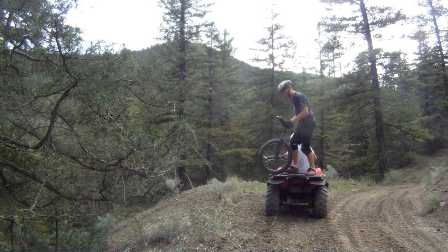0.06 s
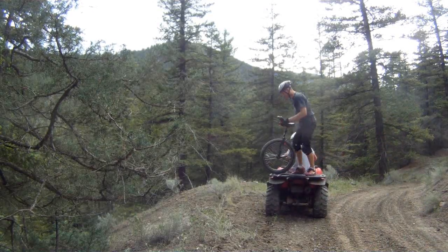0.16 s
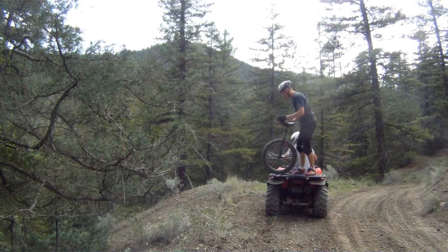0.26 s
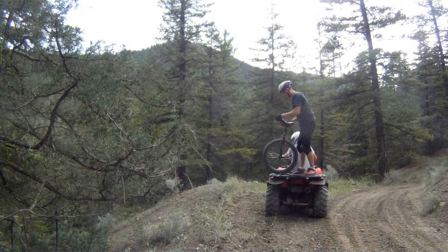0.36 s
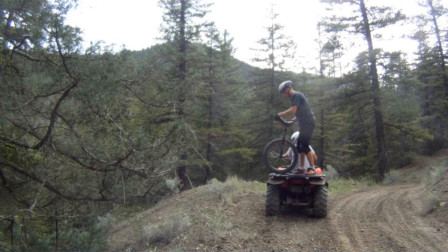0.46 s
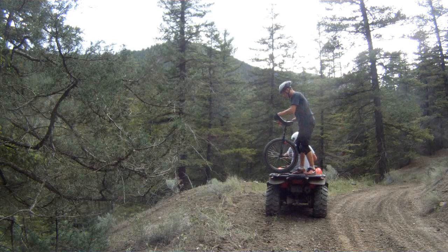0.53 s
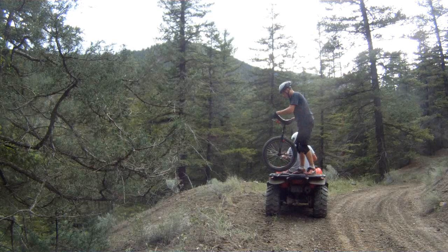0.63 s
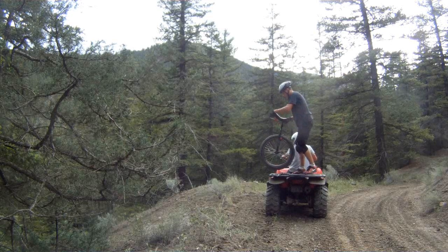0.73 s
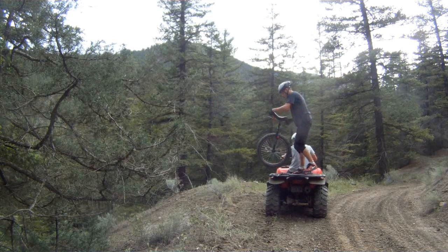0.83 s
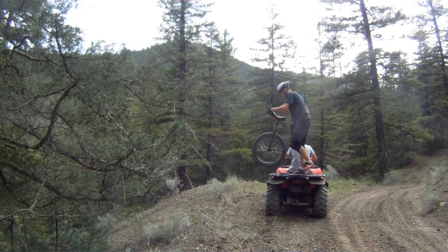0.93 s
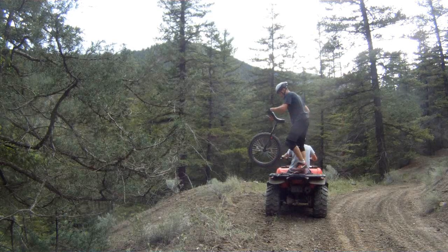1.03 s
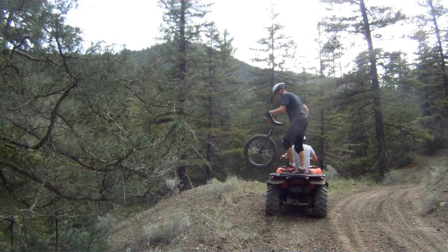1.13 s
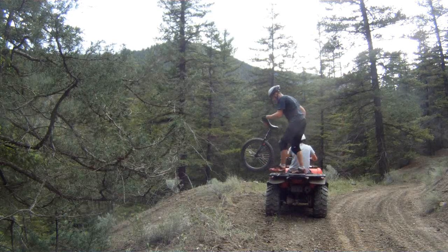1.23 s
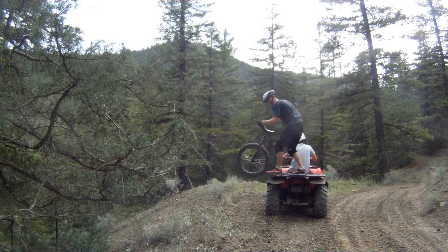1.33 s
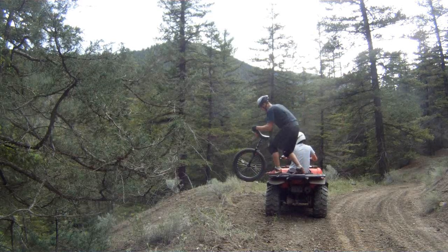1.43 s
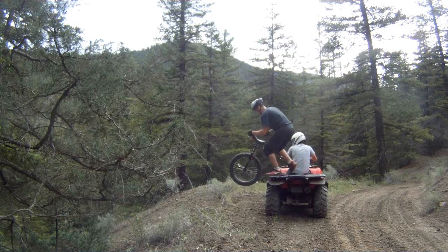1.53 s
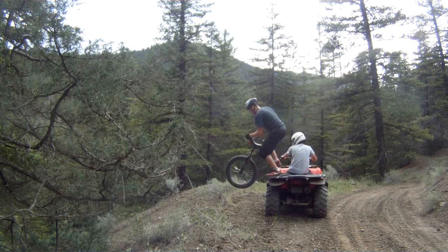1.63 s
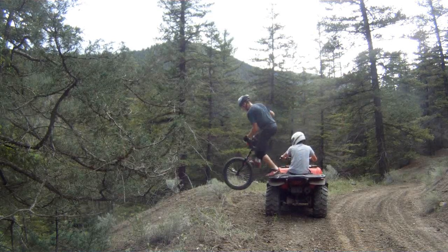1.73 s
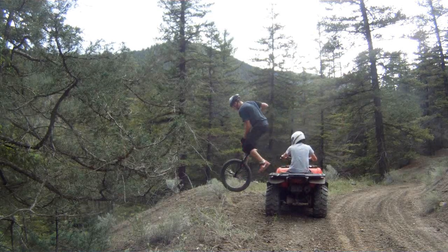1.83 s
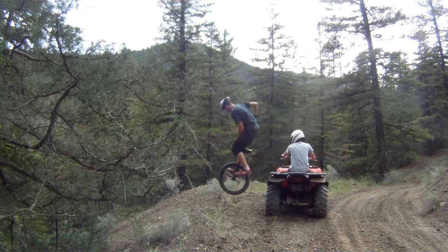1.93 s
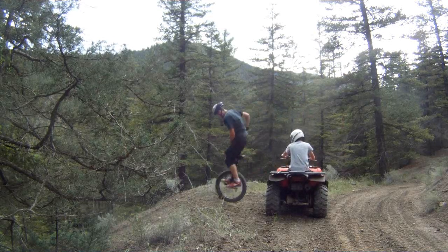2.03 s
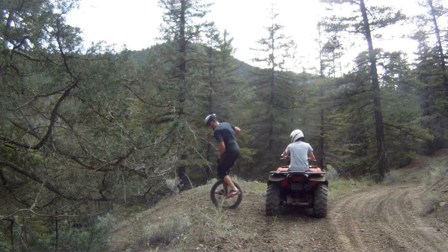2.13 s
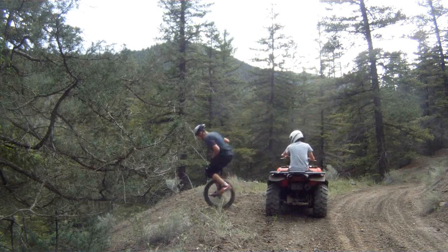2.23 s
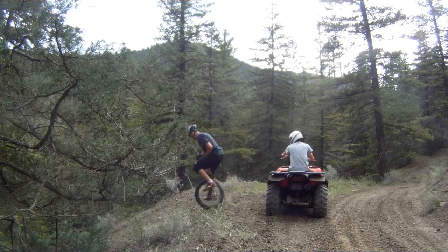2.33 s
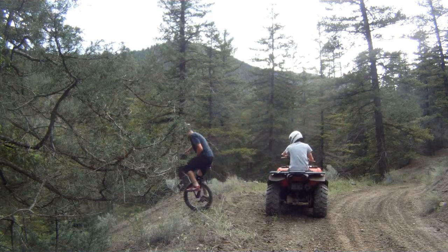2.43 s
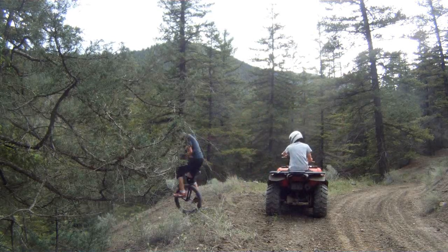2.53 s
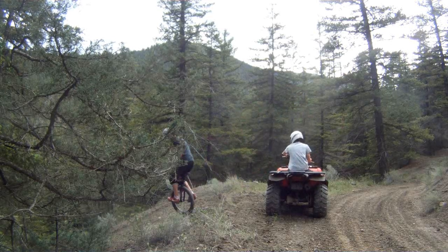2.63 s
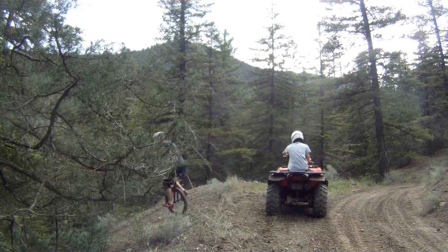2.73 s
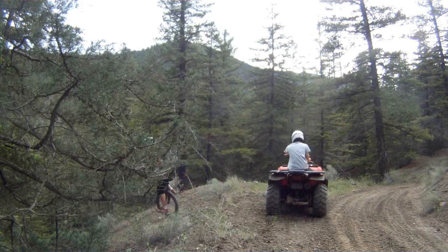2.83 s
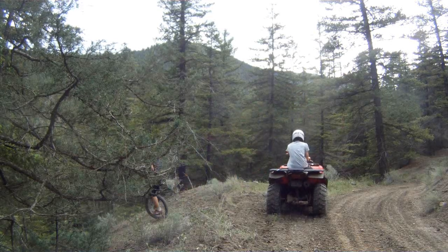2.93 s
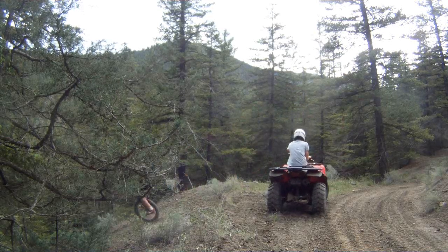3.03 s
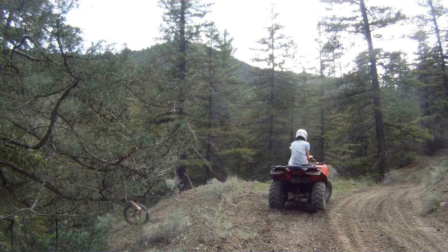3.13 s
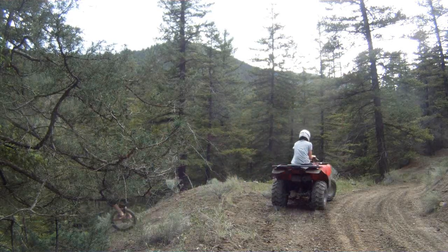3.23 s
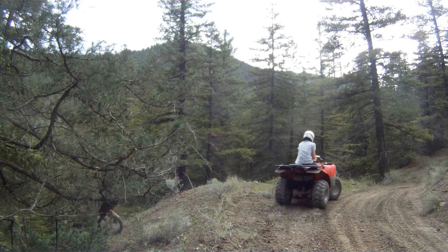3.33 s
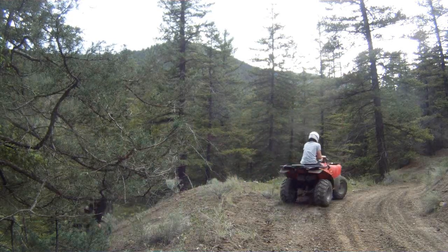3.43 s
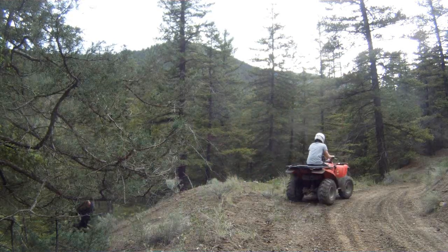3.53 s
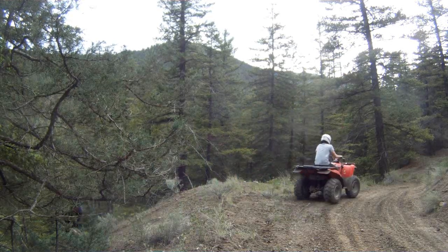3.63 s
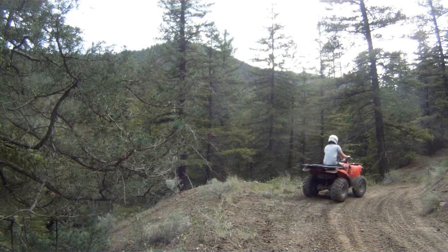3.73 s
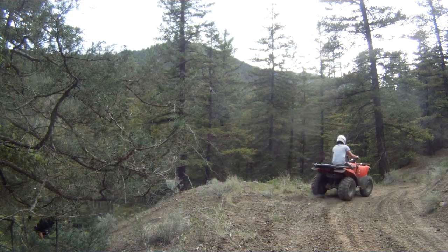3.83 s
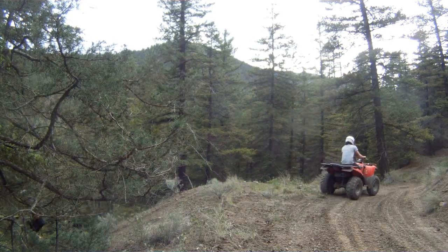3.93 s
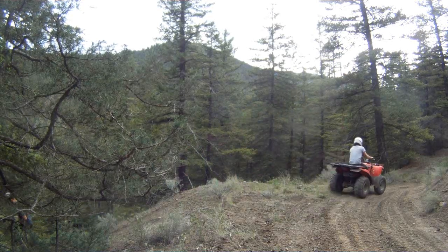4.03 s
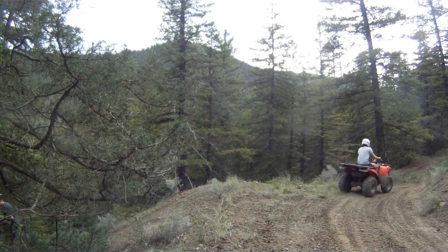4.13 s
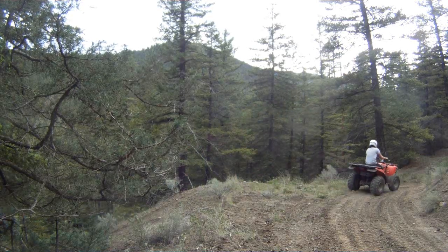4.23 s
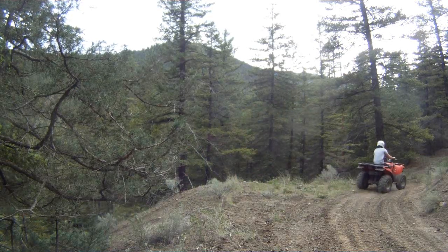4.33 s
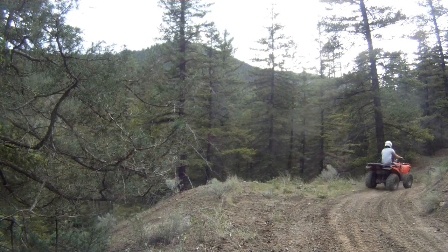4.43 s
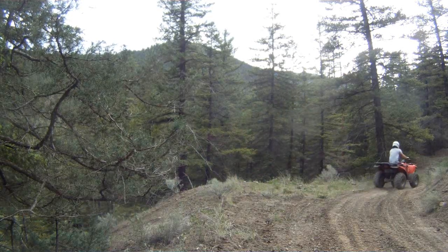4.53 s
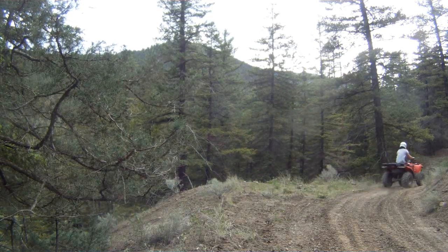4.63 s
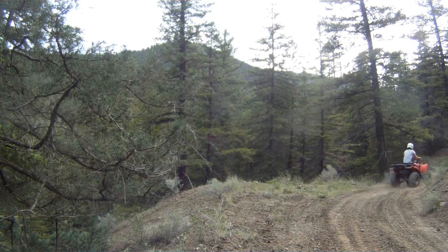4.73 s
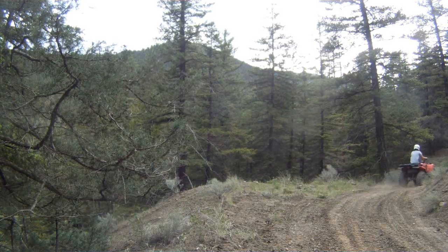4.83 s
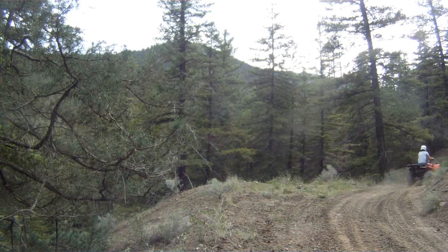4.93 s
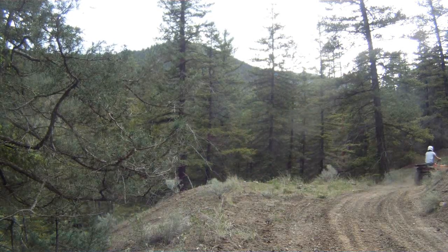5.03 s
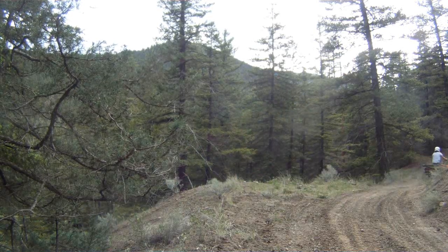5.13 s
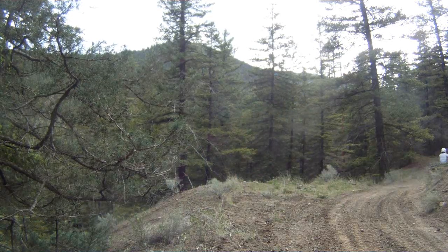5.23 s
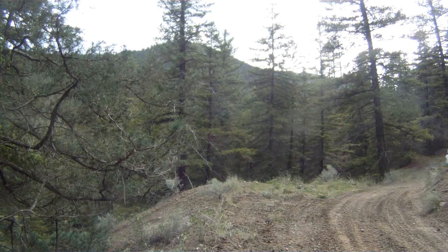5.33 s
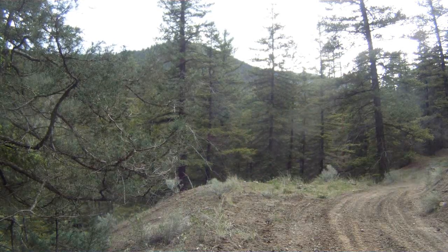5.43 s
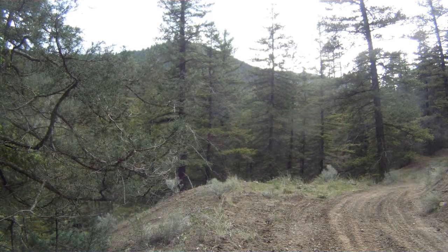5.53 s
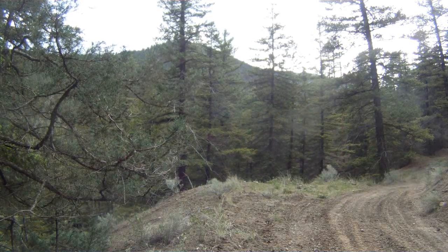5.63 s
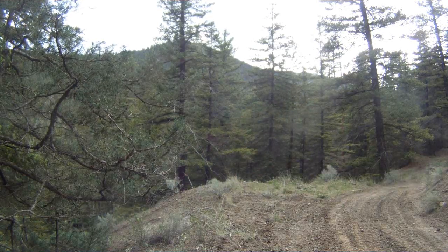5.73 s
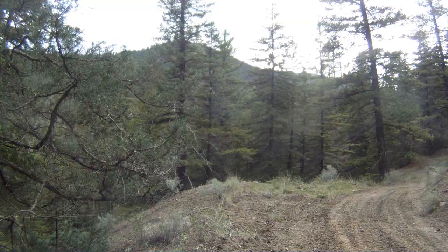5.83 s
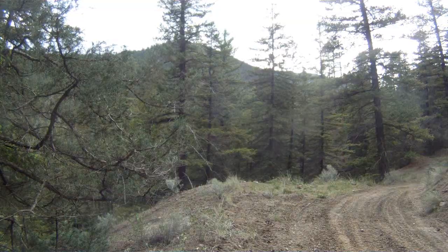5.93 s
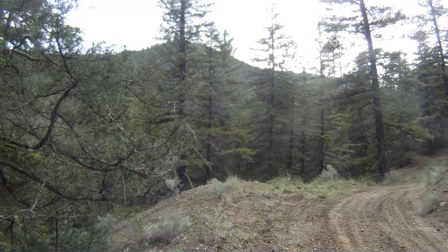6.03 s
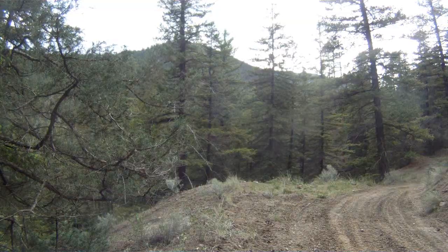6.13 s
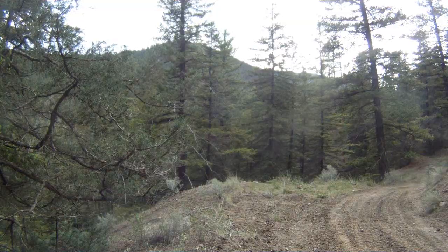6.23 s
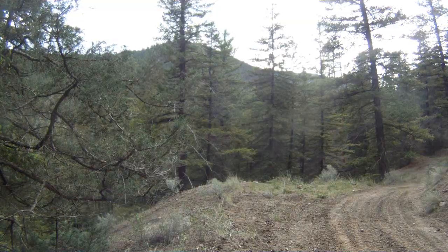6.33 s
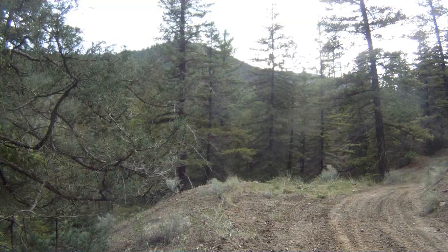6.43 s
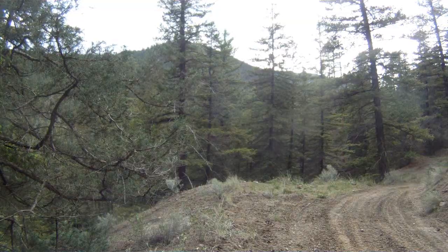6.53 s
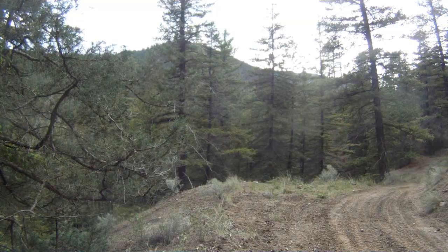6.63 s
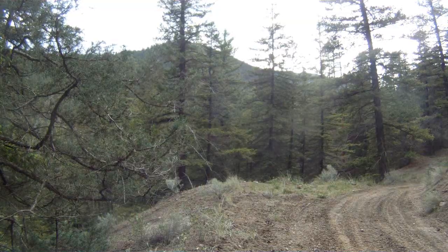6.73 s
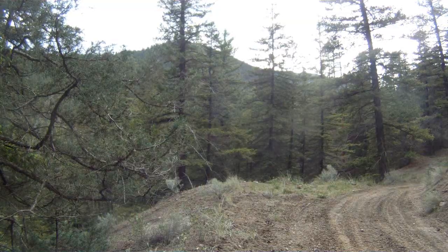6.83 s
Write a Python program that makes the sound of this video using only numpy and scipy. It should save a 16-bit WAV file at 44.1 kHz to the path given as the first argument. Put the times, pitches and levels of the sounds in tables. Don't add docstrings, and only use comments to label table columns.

```python
import sys
import numpy as np
from scipy import signal
from scipy.fft import rfft, irfft
from scipy.io import wavfile

SR = 44100
rng = np.random.default_rng(int(sys.argv[2]) if len(sys.argv) > 2 else 0)


def log_audio(samples):
    frames = np.atleast_2d(samples).T
    limited = np.clip(frames, -1, 1)
    pcm = np.round(limited * 32767).astype(np.int16)
    wavfile.write(sys.argv[1], SR, pcm)


def boost(x):
    u = np.asarray(x, float) / 20
    return 10 ** u


N = 302967
T = np.arange(N) / SR

# time_s, firings_per_s
SPEED = [(0.0, 9.03), (1.04, 9.03), (1.42, 8.34), (2.24, 8.19), (2.36, 13.53), (2.47, 17.29), (2.72, 30.08),
         (2.87, 35.88), (3.22, 35.68), (3.4, 37.68), (3.64, 44.08), (4.21, 56.05), (4.41, 57.81),
         (5.37, 51.75), (6.37, 49.02), (6.62, 49.45), (6.68, 44.97), (6.87, 45.37)]
# time_s, throttle_0_to_1, charge_db, loss_by_distance_and_terrain_db
DRIVE = [(0, 0, 1, -1), (1, 0.09, 1.5, 1), (2.07, 0.22, -2.5, -1), (2.19, 0, -4.5, -3), (2.25, .1, -5, -3),
         (2.3, 0.85, 2, 0.5), (2.64, 0.98, 3, 2.5), (3.45, 0.99, 0, 0), (3.9, 1, 2, 1),
         (4.35, 0.99, -2.5, -0.5), (4.75, 0.97, -2.5, 1.5), (5.1, 0.82, 0.5, 4), (5.45, 0.91, -0.5, 9.5),
         (5.9, 0.95, 1, 12.5), (6.64, 0.97, -1.5, 13.5), (6.69, 0.63, -1, 11), (6.87, 0.5, 5, 15)]
# centre_s, level_db
SURGES = [
    (2.55, 1.5),
    (2.86, -3.5),
    (3.15, 1),
    (3.53, -3.5),
    (3.9, 2.5),
    (4.15, -1.5),
    (4.4, 1),
    (5.27, 0.5),
]
# speed_firings_per_s, suction_dip_0_to_1, echo_0_to_1, round_trip_ms, muffler_ring_over_puff_db
PIPE_RESPONSE = [
    [(8.16, 0.23, 0, 14.4, -0.5), (9.17, 0.12, 0, 13.6, -1), (11.1, 0.53, 0.47, 12.1, -9),
     (19, 1, 0.42, 9.6, -5), (26.4, 1, 0.54, 8.45, -10), (33.7, 1, 0.26, 8.6, -29),
     (36.64, 0.86, 0.08, 10.8, -45), (36.6, 1, 0.5, 12.4, -21), (41.8, 0.9, 0.4, 9.7, -11),
     (44, 1, 0.6, 10.27, -26), (52.3, 0.37, 0.6, 8.96, -42), (57.2, 0.72, 0.56, 10.18, -14)],
    [(46, 0.7, .6, 9.6, -5), (46, 0.76, .8, 11, -30), (49.1, 0.7, 0.92, 10.9, -37),
     (50.86, 0.62, .94, 10.5, -35), (51.55, 0.55, 0.94, 9.7, -33), (53, .6, 0.62, 10.1, -38),
     (56.2, 0.73, 0.65, 10.4, -10.5), (58.4, 0.7, 0.47, 9.76, -15)],
]
# speed_firings_per_s, level_over_puff_db, lead_before_puff_cycles, pitch_hz
AIRBOX_HONK = [
    [(9, -23, 1, 210), (18.5, -37, 0.44, 290), (25.8, -13, 0.47, 290), (32.2, -11, .38, 293),
     (36.6, -8, 0.347, 306), (37.6, -12.5, 0.342, 288), (40.5, -13, 0.351, 278), (47.5, -19, 0.354, 258),
     (52.5, -6.5, 0.286, 276), (59.4, -10, 0.33, 298)],
    [(45.5, -21, 0.484, 240), (46, -13, 0.39, 280), (49.1, -10.5, 0.373, 293), (49.74, -6.5, 0.373, 297),
     (51, -13.5, 0.358, 299), (52.7, -8, 0.341, 306), (56.4, -8, 0.329, 269), (59, -11.5, 0.338, 260)],
]
# speed_firings_per_s, ring_over_puff_db, ring_pitch_hz, bark_near_1_khz_over_crack_db
TAILPIPE = [
    [(8.55, -27, 573, 15), (14.1, -10.5, 625, 11.5), (18.6, -40, 700, 11.5), (35.3, -40, 490, 10.5),
     (42.6, -55, 920, 5), (55.3, -13, 405, 6), (57.4, -5, 424, -4)],
    [(47, -18, 450, -22.5), (49.9, -20, 555, -19), (51.2, -14, 565, 7), (54.3, -27, 400, 2),
     (55.9, -6.5, 362, 3), (58.05, -5, 420, -4)],
]
# pitch_hz, level_db, t60_s
MUFFLER_MODES = [(92.5, -1, 0.11), (61.4, -6.5, 0.092), (129, -2, 0.04)]
# pitch_hz, level_db, t60_s
ECHO_MODES = [(116, -4.5, 0.15)]
# frequency_hz, density_db_per_hz
GAS_COLOUR = [(410, -25.5), (700, -2), (1040, -11), (1150, -2.5), (1370, -8.5), (1950, -6.5), (2840, -2.5),
              (3020, -3), (3390, -19), (3950, -11), (4470, -32.5), (5400, -27), (5900, -32), (7670, -70),
              (13000, -120)]
# frequency_hz, density_db_per_hz
RUSH_COLOUR = [(25, -38), (60, 2.5), (150, -1.5), (300, 2.5), (600, 1.5), (800, -6), (1100, -17.5),
               (1600, -34.5)]
# frequency_hz, density_db_per_hz
FOREST_COLOUR = [(300, -19), (1200, -12), (1800, -11), (2400, 5), (3000, -16), (3700, -2), (4800, -10.5),
                 (5900, -22)]
# pitch_hz, spread_percent, level_over_crack_db, t60_s, share_of_bark
OUTLET_RINGS = [(950, 9, -5, .022, 1), (2740, 6, 3, .024, -.9)]
# multiple_of_firing_rate, level_db
WHINE_ORDERS = [(11, -27.5), (12, -35.5), (13, -35)]
# frequency_hz, gain_db
COVER_RESONANCE = [(290, -45), (390, -6), (470, -7), (530, -3), (590, -3.5), (635, 0), (700, 1.5),
                   (750, -8)]
# start_s, peak_db, pitch_hz, t60_s
RACK_TICKS = [(0.2157, -20.5, 730, 0.024), (0.218, -30, 1700, 0.011), (.2175, -39, 2800, .015),
              (.289, -46, 2580, .03), (.3135, -24.5, 730, 0.03), (.315, -42, 1700, 0.017),
              (1.321, -50, 3930, .02), (1.333, -53, 4700, .02), (1.951, -56, 3740, 0.053),
              (2.113, -39, 2600, .025), (2.128, -42, 2450, 0.027), (2.142, -46, 2550, .03)]
# pitch_hz, level_db, t60_s
KNOCK_MODES = [(330, 11, 0.012), (414, -16.5, 0.11), (510, -28, 0.023), (1400, -18, 0.011),
               (2370, -14.5, 0.0099), (2900, -18, .014)]

START_CYCLE = -.0714
KNOCK_S, KNOCK_DB = 2.2663, -5
KNOCK_SWELL_S, KNOCK_EDGE_S, CRACK_EDGE_S = .0017, .0007, .0005
HONK_HALF_MS, SURGE_HALF_S = 5.54, 0.073
PUFF_DB, RISE_MS, CRACK_DB, WHINE_DB = (-18.5, -6), (2.43, 1.045), (-52, -23.5), (-17, 0)
ROAR_DB, RUSH_DB, FOREST_DB = (-62.5, -54), (-46.5, -43), (-67, -65)
IDLE_PER_S, ROAR_DB_PER_OCTAVE, RUSH_DB_PER_OCTAVE, FOREST_DB_PER_OCTAVE = 9.8, 7, 3.5, 7.5
ROAR_FADE, RUSH_FADE, FOREST_FADE, WHINE_FADE = 1.08, 0.9, 0.69, 0.97
CRACK_FADE_DB, CRACK_FADE_POWER = 14.5, 3.55
CRACK_HOLLOW_DB, CRACK_TOP_DB = -1.5, -1.5
IDLE_LIFT, IDLE_WHISTLE_DB, LIFT_PER_OCTAVE = (1.19, 1.26), (1.5, 11), (0, 0.4)
LIFT_FROM_PER_S = 52.1
HELD_HZ, CLOCK_STEPS = 12000, 4


def at_times(rows, times):
    s, *columns = np.transpose(rows)
    return [np.interp(times, s, column) for column in columns]


def add(out, start_s, sound):
    i = round(start_s * SR)
    part = out[max(i, 0):i + len(sound)]
    part += sound[max(-i, 0):][:len(part)]


def bell(s, half_s):
    return np.exp(-(s / half_s) ** 2)


def struck(s, modes):
    s = np.maximum(s, 0)
    return sum(boost(db - 60 * s / t60) * np.sin(2 * np.pi * hz * s) for hz, db, t60 in modes)


def noise_bands(colour, count):
    hz = np.arange(1, N // 2 + 2) * SR / N
    at_hz, db = np.transpose(colour)
    spectrum = rfft(rng.standard_normal(N)) * boost(np.interp(np.log(hz), np.log(at_hz), db))
    place = np.interp(np.log(hz), np.log([500, 5000]), [0, count - 1])
    bands = np.array([irfft(spectrum * np.maximum(1 - abs(place - k), 0), N) for k in range(count)])
    return bands / np.std(bands.sum(0))


def cycles():
    return START_CYCLE + np.cumsum(at_times(SPEED, T)[0]) / SR


def firings():
    return np.interp(np.arange(int(cycles()[-1]) + 1), cycles(), T)


def controls(times):
    throttle, charge_db, loss_db = at_times(DRIVE, times)
    throttle = np.clip(throttle, 0, 1)
    return at_times(SPEED, times)[0], charge_db, loss_db, lambda pair: pair[0] + (pair[1] - pair[0]) * throttle


def by_speed(maps, times):
    speed = at_times(SPEED, times)[0]
    easing = times > times[np.argmax(speed)]
    return np.where(easing, at_times(maps[1], speed), at_times(maps[0], speed))


def puff(s, rise_s):
    x = np.maximum(s / rise_s + 1, 0)
    return x ** 2 * np.exp(2 - 2 * x)


def stroke_settings(fired):
    _, charge_db, loss_db, by_throttle = controls(fired)
    dip, echo, trip_ms, ring_db = by_speed(PIPE_RESPONSE, fired)
    honk_db, lead, honk_hz = by_speed(AIRBOX_HONK, fired)
    tail_db, tail_hz, _ = by_speed(TAILPIPE, fired)
    puff_db = by_throttle(PUFF_DB) + charge_db - loss_db
    return [puff_db, by_throttle(RISE_MS), dip, echo, trip_ms, puff_db + ring_db, puff_db + honk_db, lead, honk_hz,
            puff_db + tail_db, tail_hz]


def exhaust(fired):
    out, s = np.zeros(N), np.arange(-.06, .11, 1 / SR)
    chance = rng.standard_normal((len(fired), 4))
    rows = np.transpose(stroke_settings(fired))
    for at, cycle_s, luck, row in zip(fired, np.gradient(fired), chance, rows):
        puff_db, rise_ms, dip, echo, trip_ms, ring_db, honk_db, lead, honk_hz, tail_db, tail_hz = row
        rise, trip = rise_ms / 1000, trip_ms / 1000
        pipe = puff(s, rise)
        pipe += echo * bell(s - trip, 1.15 * rise) + echo ** 2 * bell(s - 2 * trip, 1.9 * rise)
        pipe -= dip * bell(s + 2.11 * rise, 0.0012)
        ring = struck(s + rise, MUFFLER_MODES) * (1 - bell(s + rise, 0.0036))
        ring += struck(s + 1.61 * rise - trip, ECHO_MODES)
        tail = struck(s + rise, [(tail_hz, 0, .03)])
        early = s + lead * cycle_s
        honk = bell(early * 1000, HONK_HALF_MS) * np.cos(2 * np.pi * honk_hz * early)
        db = np.array([puff_db, ring_db, honk_db, tail_db]) + 0.21 * luck
        add(out, at + s[0], boost(db) @ [pipe, ring, honk, tail])
    return signal.sosfilt([signal.butter(2, hz, "high", fs=SR, output="sos")[0] for hz in (38, 28)], out)


def gas_levels():
    speed, charge_db, loss_db, by_throttle = controls(T)
    octaves = np.log2(speed / IDLE_PER_S)
    crack_loss_db = CRACK_FADE_DB * (np.maximum(loss_db, 0) / 10) ** CRACK_FADE_POWER
    return (by_throttle(CRACK_DB) + 0.25 * charge_db - crack_loss_db,
            by_speed(TAILPIPE, T)[-1],
            by_throttle(ROAR_DB) + ROAR_DB_PER_OCTAVE * octaves - ROAR_FADE * loss_db,
            by_throttle(RUSH_DB) + RUSH_DB_PER_OCTAVE * octaves - RUSH_FADE * loss_db,
            by_throttle(FOREST_DB) + FOREST_DB_PER_OCTAVE * octaves - FOREST_FADE * loss_db)


def surge():
    return sum(db * bell(T - at, SURGE_HALF_S) for at, db in SURGES)


def outlet_rings(since, last, luck, bark_db):
    out, idle = 0, T < KNOCK_S
    octaves = np.log2(at_times(SPEED, T)[0] / LIFT_FROM_PER_S)
    for k, (hz, spread, db, t60, share) in enumerate(OUTLET_RINGS):
        pitch, strength = luck[last, 2 * k], luck[last, 2 * k + 1]
        lift = np.where(idle, IDLE_LIFT[k], 1 + LIFT_PER_OCTAVE[k] * np.maximum(octaves, -.3))
        level_db = db + 2.9 * strength + share * bark_db + IDLE_WHISTLE_DB[k] * idle
        ring_hz = hz * lift * (1 + spread / 100 * pitch)
        out = out + struck(since, [(ring_hz, level_db, t60)]) * (1 - bell(since, 0.0021))
    return out


def gas_noise(fired):
    crack_db, bark_db, roar_db, rush_db, _ = gas_levels()
    idle = T < KNOCK_S
    last = np.clip(np.searchsorted(fired - .0016, T) - 1, 0, None)
    since = np.maximum(T - fired[last] + 0.001863, 0)
    luck = np.clip(rng.standard_normal((len(fired), 12)), -1.5, 1.5)
    colour = boost(2.6 * luck[:, 1:8] + 1.0 * luck[:, :1])[last].T
    colour[1:3] *= boost(bark_db * [[.5], [.4]])
    colour[3] *= boost(CRACK_HOLLOW_DB)
    colour[5:] *= boost(CRACK_TOP_DB)
    colour[5] *= boost(1.2 * idle)
    burst = (1 - np.exp(-since / CRACK_EDGE_S)) * np.exp(-since / 0.0046)
    burst += .22 * bell(since - .021, .004) * idle
    crack = np.sum(noise_bands(GAS_COLOUR, count=7) * colour, axis=0) * burst
    crack += outlet_rings(since, last, luck[:, 8:], bark_db)
    roar = noise_bands(GAS_COLOUR, count=1)[0] * (1 + .5 * np.exp(-since / 0.0022))
    rush = noise_bands(RUSH_COLOUR, count=1)[0] * (1 + 0.32 * np.exp(-since / 0.073))
    return boost(surge()) * (boost(crack_db) * crack + boost(roar_db) * roar) + boost(rush_db) * rush


def whine():
    speed, _, loss_db, by_throttle = controls(T)
    out, phase = 0, 2 * np.pi * cycles()
    for order, db in WHINE_ORDERS:
        cover_db = at_times(COVER_RESONANCE, order * speed)[0]
        level_db = db + cover_db - WHINE_FADE * loss_db + by_throttle(WHINE_DB)
        out = out + boost(level_db) * np.sin(round(order) * phase)
    return out


def forest_air():
    return boost(gas_levels()[-1]) * noise_bands(FOREST_COLOUR, count=1)[0]


def rack_ticks():
    out, s = np.zeros(N), np.arange(0, .12, 1 / SR)
    for at, db, hz, t60 in RACK_TICKS:
        modes = [(hz, db, t60), (1.156 * hz, db - 11, t60)]
        add(out, at, struck(s, modes) * (1 - np.exp(-s / 0.0013)))
    return out


def knock():
    out, s = np.zeros(N), np.arange(0, .12, 1 / SR)
    heavy = struck(s, KNOCK_MODES[:3]) * (1 - bell(s, KNOCK_SWELL_S))
    light = struck(s, KNOCK_MODES[3:]) * (1 - bell(s, KNOCK_EDGE_S))
    add(out, KNOCK_S, boost(KNOCK_DB) * (heavy + light))
    return out


def scene():
    fired = firings()
    engine = exhaust(fired) + gas_noise(fired) + whine()
    return (engine + forest_air() + rack_ticks() + knock())[None]


def low_pass(x):
    return signal.sosfilt(signal.butter(12, 16450, fs=SR, output="sos"), x)


def record(dry):
    coarse = signal.resample_poly(dry, HELD_HZ // 300, SR // 300, axis=1)
    held = np.repeat(coarse, CLOCK_STEPS, axis=1)
    out = signal.resample_poly(held, SR // 300, HELD_HZ * CLOCK_STEPS // 300, axis=1)[:, :N]
    out = signal.sosfilt(signal.cheby1(10, 1, 15100, fs=SR, output="sos"), out)
    mix = np.pad(out, ((0, 0), (0, N - out.shape[1])))
    return low_pass(mix)


dry = scene()
out = record(dry)
log_audio(out)
```